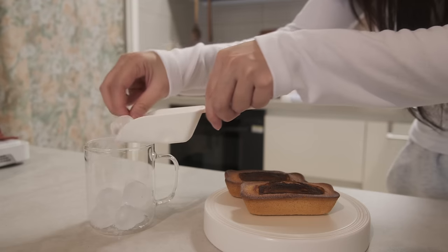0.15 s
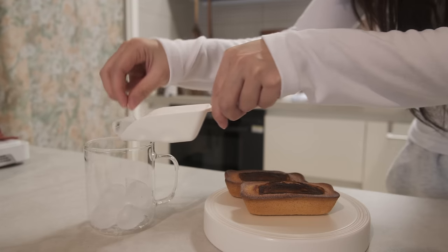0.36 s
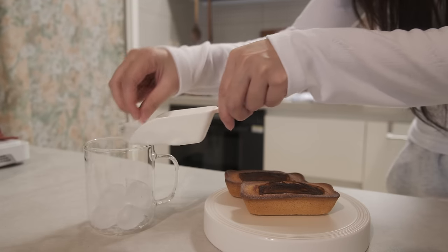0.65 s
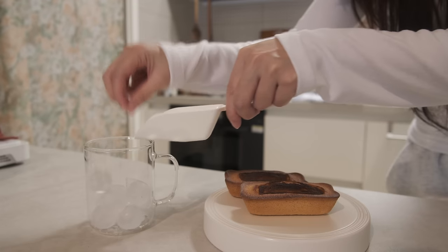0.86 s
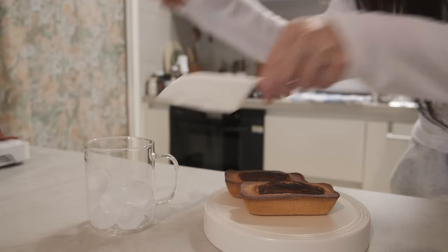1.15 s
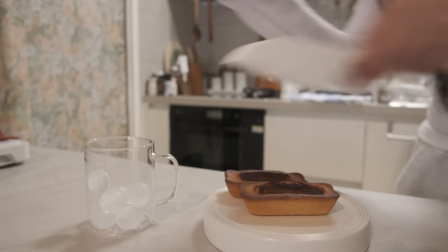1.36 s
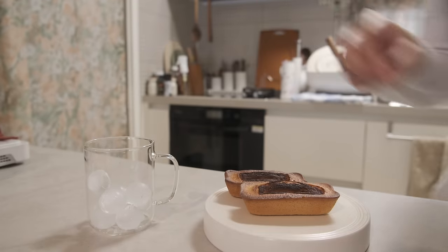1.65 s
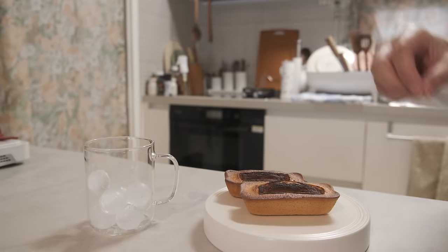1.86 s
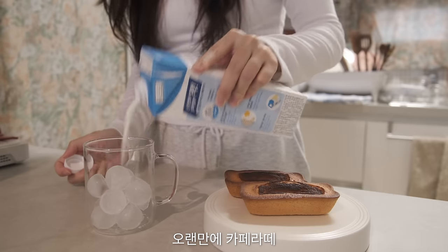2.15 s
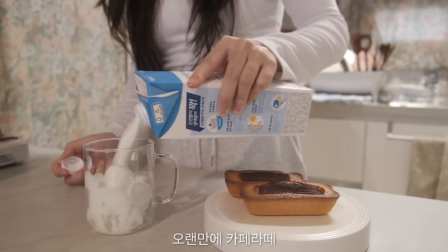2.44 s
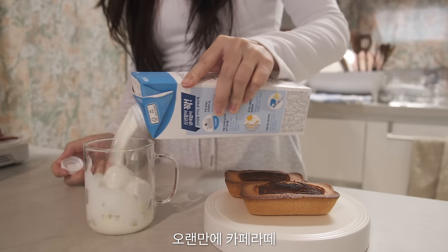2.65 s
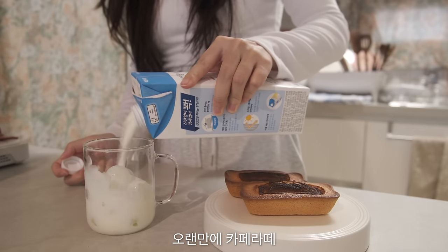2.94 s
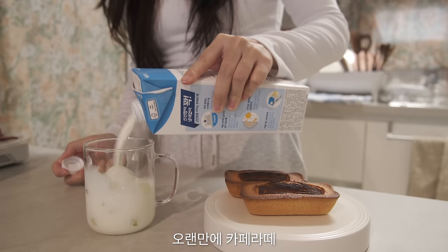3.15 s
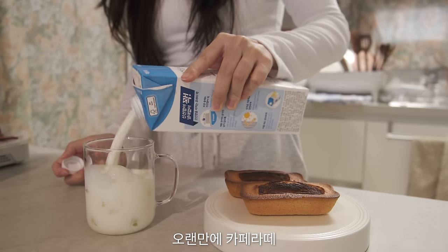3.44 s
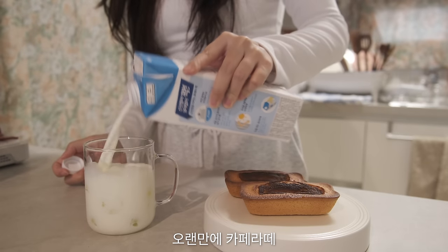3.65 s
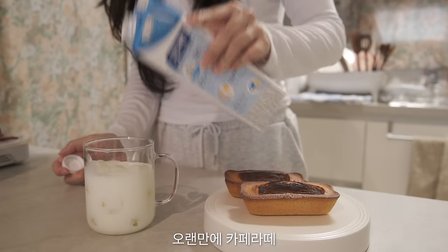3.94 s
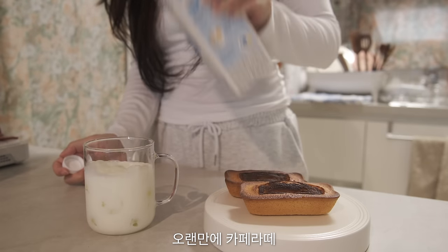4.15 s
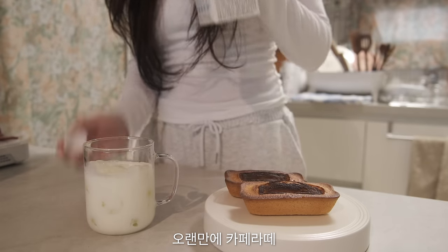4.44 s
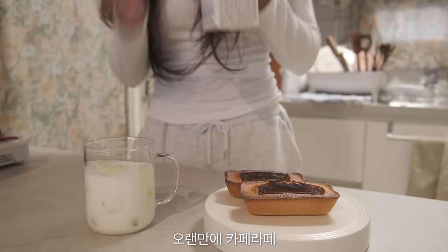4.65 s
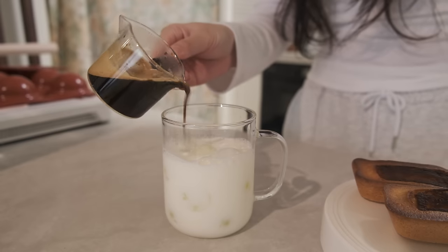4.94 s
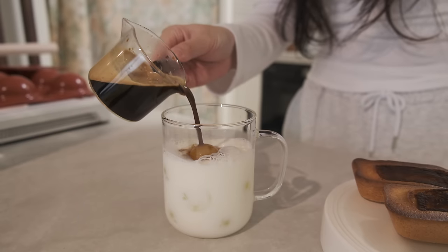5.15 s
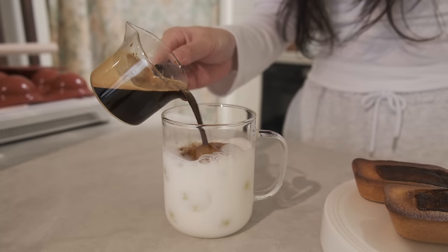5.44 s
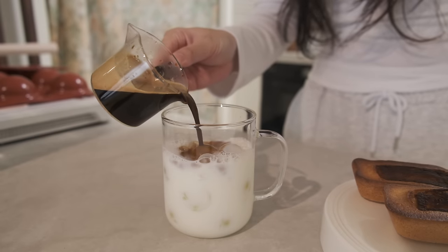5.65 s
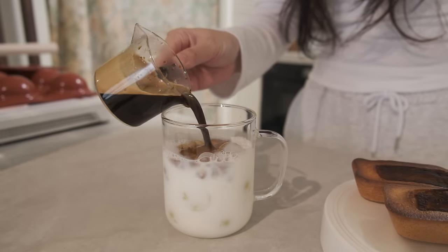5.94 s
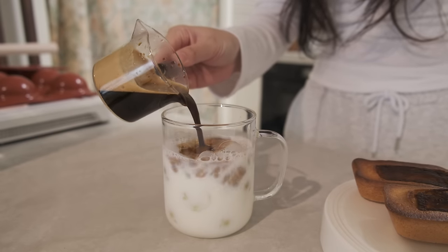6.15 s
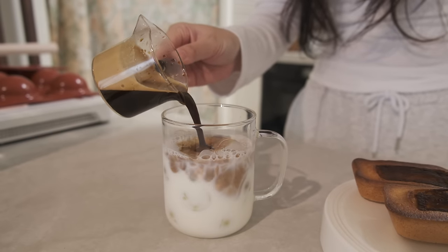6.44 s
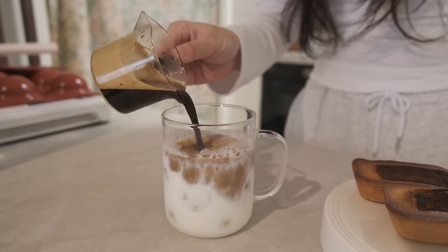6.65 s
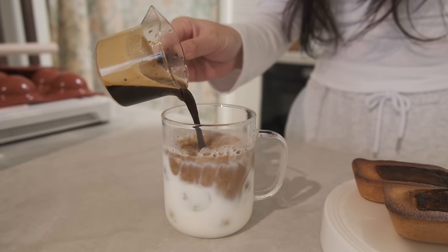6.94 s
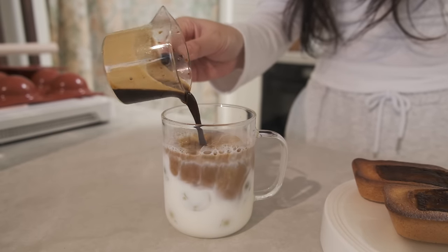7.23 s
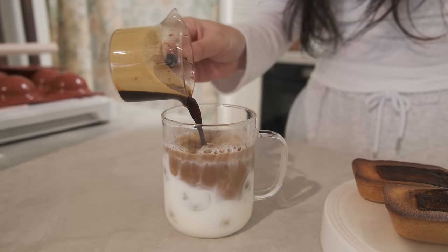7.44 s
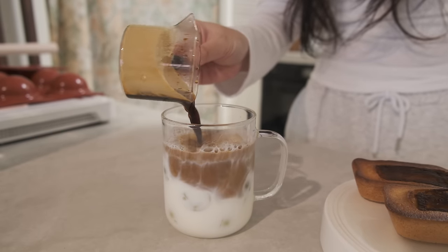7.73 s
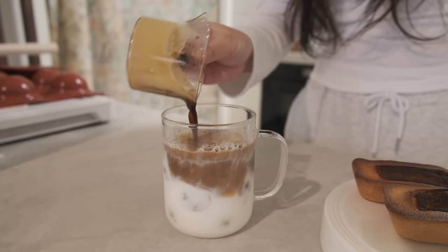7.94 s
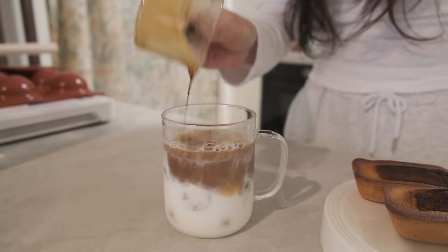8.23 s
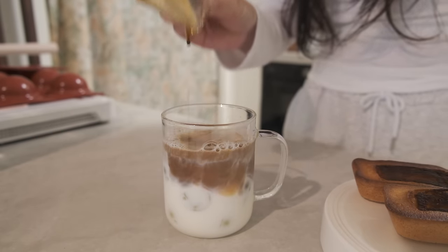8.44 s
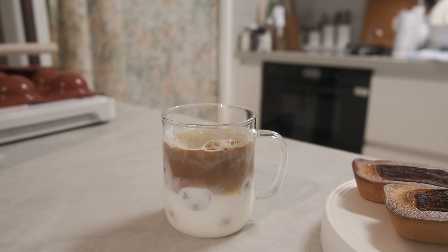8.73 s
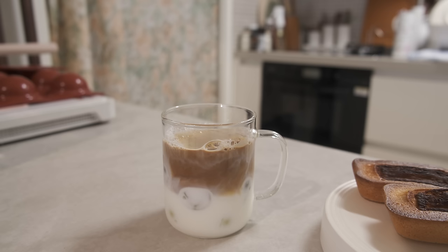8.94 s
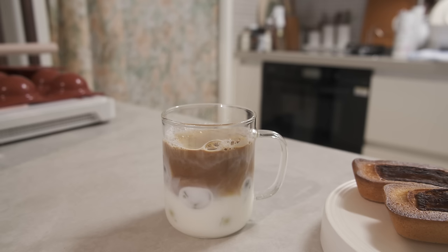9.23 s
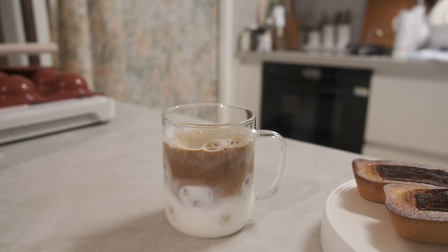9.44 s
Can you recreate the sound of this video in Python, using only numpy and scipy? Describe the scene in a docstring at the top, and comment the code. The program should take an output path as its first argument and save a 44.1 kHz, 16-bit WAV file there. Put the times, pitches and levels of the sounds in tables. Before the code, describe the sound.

A quiet kitchen, heard up close, with a faint fridge hum and hiss throughout. At the start a plastic tray clicks and rubs, and three ice balls drop into a glass mug by 0.3 seconds, each a sharp clack with a short glassy ring. Two more land at about 0.8 seconds. Around 1.5 seconds the tray gives a quick cluster of clicks and scrapes. From 2.3 to 3.4 seconds milk pours over the ice with soft gurgles, plinks and a light fizz. The ice cracks in loud, bright, irregular snaps from about 2.5 until 4.4 seconds, with slight room echo. Then it turns much quieter: a faint tick near 5 seconds, a small knock with a tiny tinkle near 5.9, and two faint ticks just after 8. From 8.6 seconds to the end, around 9.6, come a soft handling rustle and several light counter knocks.

```python
"""A quiet kitchen; a fridge hums throughout. In the first 2 s a plastic tray clicks and rubs as ice
balls are worked out and drop into a glass mug, ringing it. From 2.3 to 3.4 s milk gurgles over them;
the warming ice cracks sharply until 4.4 s. Then a few ticks and small knocks, and from 8.6 s a rustle
of handling. The room answers the hits; the loudest clip and pull the gain down."""
import sys
import numpy as np
from scipy import signal
from scipy.fft import rfft, irfft, next_fast_len
from scipy.io import wavfile
from scipy.ndimage import minimum_filter1d, map_coordinates

SR = 44100
rng = np.random.default_rng(int(sys.argv[2]) if len(sys.argv) > 2 else 0)


def bounce(signal):
    """Save signal as a 16-bit WAV file at the path given by the first command-line argument."""
    frames = np.transpose(np.atleast_2d(signal))
    limited = np.clip(frames, -1, 1)
    pcm = np.round(limited * 32767).astype(np.int16)
    wavfile.write(sys.argv[1], SR, pcm)


N = 422458
T = np.arange(N) / SR
HIT_SAMPLES = SR * 2 // 3

# Fridge tones. Each row: frequency in Hz, level in dB.
FRIDGE_HUM = [(48.4, -61.5), (193.8, -64), (290.7, -64.5), (387.6, -66), (484.5, -77), (1061, -88.5)]
# Thin high tones. Each row: frequency in Hz, level in dB, start and end in seconds.
WHINES = [(15569, -75, 0, 4.7), (15569, -82, 4.7, 9.6), (12250, -70, 4.74, 5.26), (12250, -71, 8.56, 9.6)]
# Room hiss. Each row: time in seconds, level in dB.
HISS_LEVELS = [(0, -69), (2, -59.5), (4.7, -60), (5.3, -62), (8.54, -62), (8.57, -57), (9.6, -62)]
# Drone width. Each row: frequency in Hz, left-right likeness from 0 to 1.
DRONE_LIKENESS = [(60, 0.77), (180, 1), (550, 0.53), (1650, 0.18), (4970, 0.24), (15000, 0.14)]
# Strokes of tray, sleeves and hands. Each row: peak time in seconds, swell and fade in seconds
# per 20 dB, body and fizz in dB.
STROKES = [(0.002, 0.02, 0.15, -34, -30), (0.08, 0.0065, 0.061, -43, -23), (0.109, 0.029, 0.049, -36, -31),
           (0.704, 0.054, 0.073, -39.5, -28.5), (1.164, 0.0313, 0.083, -57, -44.5),
           (1.276, .12, 0.31, -67, -54), (1.45, .005, 0.057, -32.5, -31.5), (1.486, 0.02, 0.14, -42.5, -34),
           (1.622, 0.0025, 0.038, -48.5, -33), (1.72, 0.26, .12, -55.5, -50.5),
           (4.714, 0.078, 0.062, -57.5, -50), (8.794, 0.161, 0.32, -88, -76), (8.922, .006, .12, -72, -51),
           (9.028, .004, 0.08, -77, -58), (9.143, 0.035, 0.046, -39, -61), (9.27, 0.07, 0.034, -51.5, -48),
           (9.436, .12, 0.05, -88, -93)]
# Counter knocks. Each row: start in seconds, peak in dB, pitch in Hz, sharpness in dB, t60 in seconds.
COUNTER_KNOCKS = [(5.851, -29, 530, -2, 0.065), (5.909, -63, 510, 12, 0.098),
                  (8.654, -36.5, 1210, -5, 0.36), (8.697, -37, 2237, 17, 0.26),
                  (8.938, -33.5, 1193, 22, 0.13), (9.132, -36, 1250, 1, 0.27),
                  (9.276, -26.5, 1580, -6, 0.17), (9.533, -43, 1046, 12, 0.12)]
# Tray clicks, then faint ticks. Each row: start in seconds, peak in dB, colour in Hz, t60 in seconds,
# pan in dB (left over right).
DRY_CLICKS = [(0.0772, -12, 9100, 0.018, 7), (0.1, -12.5, 3250, .01, -3), (0.4314, -49, 1723, 0.018, -10),
              (0.605, -42.5, 3660, 0.02, 1.5), (0.699, -20, 10200, 0.013, -6),
              (1.1617, -32, 2890, 0.06, -4.5), (1.277, -42, 3600, 0.033, -7), (1.319, -34.5, 10050, .03, 0),
              (1.43, -29.5, 5040, 0.08, -6), (1.4479, -18, 3240, 0.043, 0.5),
              (1.4684, -3, 10200, 0.0099, 3), (1.4846, -9.5, 8450, 0.029, -10.5),
              (1.515, -20.5, 1430, 0.013, 1.5), (1.538, -24, 1790, 0.01, -2.5),
              (1.6206, -13.5, 10200, 0.038, -12), (1.716, -35, 1490, .02, -7),
              (1.799, -29, 9700, 0.019, -8), (5.0468, -43, 2200, 0.016, -1.5),
              (5.8502, -34.5, 2250, 0.028, 5), (8.1445, -36.5, 2520, 0.0078, -5),
              (8.1567, -36, 2370, .02, -3), (8.919, -37, 6500, 0.082, -2.5),
              (9.0278, -32.5, 8800, 0.15, -6.5)]
# Distinct glugs and plinks. Each row: start in seconds, peak in dB, pitch in Hz.
LOUD_BUBBLES = [(2.3996, -29.5, 2822), (2.412, -38.5, 425), (2.4397, -32, 1450), (2.478, -33, 3405),
                (2.529, -35, 739), (2.55, -35, 3160), (2.554, -34, 928), (2.5988, -32, 2660),
                (2.64, -38.5, 684), (2.668, -34.5, 980), (2.6986, -40, 3100), (2.736, -37.5, 578),
                (2.7362, -35, 2165), (2.811, -47.5, 613), (2.8667, -25, 2020), (2.889, -30, 1073),
                (2.926, -34.5, 606), (2.9384, -34, 2362), (2.9867, -32.5, 1800), (2.988, -34, 1140),
                (3.057, -17, 1090), (3.0694, -27.5, 2035), (3.3026, -35.5, 2660), (3.4494, -38.5, 1840)]
# Milk stream. Each row: time in seconds, gurgle and fizz in dB.
POUR_LEVELS = [(2.3, -63, -68.5), (2.45, -57, -43), (2.62, -50, -52.5), (2.98, -42.5, -39.5),
               (3.11, -56, -58.5), (3.32, -49, -44.5), (3.4, -64.5, -52)]
# Ice landings. Each row: start in seconds, snap and thud peaks in dB, thud t60 in seconds,
# mug ring in dB, pan in dB.
ICE_DROPS = [(0.1434, 2, -13, 0.025, -18.5, 8.5), (0.2212, -31, -4, 0.079, -21, 0.5),
             (0.3041, -18.5, -19, 0.36, -26, 1.5), (0.8074, -4, -5.5, 0.032, -26, -2),
             (0.8340, 4, -11, 0.018, -16.5, 7)]
# Ice splits. Each row: start in seconds, snap peak in dB, bite and push in dB over the snap,
# snap t60 in seconds, pan in dB.
ICE_CRACKS = [(2.214, -31, -23, -39, 0.0072, 3.5), (2.462, -14.5, -23, -24.5, 0.028, 8),
              (2.7645, -9, -18, -24.5, 0.0085, 4), (2.81, -17, -30, -27, 0.0064, 2),
              (2.8526, -4, -20, -41, 0.018, 4.5), (3.0542, 2, -14, -15.5, 0.015, 5),
              (3.1282, -0.5, -12, -16.5, 0.02, 5.5), (3.3169, -0.5, -10.5, -19.5, 0.018, 1),
              (3.4267, 1, -15, -15.5, 0.024, 6.5), (3.5712, -4, -15.5, -17, 0.025, -0.5),
              (3.7881, -1, -9.5, -17.5, 0.016, 12), (3.793, -7, -13, -9.5, 0.014, 9),
              (3.8902, -1, -18, -39, 0.009, 3.5), (4.3771, -4.5, -5, -20.5, 0.014, -5),
              (4.3822, -16.5, 0.5, -17, 0.0098, 3)]

# Ringing modes. Each row: frequency in Hz, relative level in dB, t60 in seconds.
MUG_MODES = [(1037, -11, .3), (2380, -4, .3), (2508, -2, .34), (3393, -5, .28), (4079, -13, .18),
             (4854, -3, .28), (5484, -3, .25), (5939, -4, .33), (6643, -6, .21), (7219, -6, .21),
             (7580, -7, .2), (8459, -4, .24), (9100, -7, .24), (11160, -6, .21), (11920, -12, .18)]
TINKLE_MODES = [(7725, 5, 0.048), (10210, 0.5, 0.11)]

# Noise spectra. Each row: frequency in Hz, relative density in dB.
DRONE_SPECTRUM = [(15, -40), (25, -14.5), (54, -6), (76, -17.5), (185, -8.5), (262, -9), (289, -21),
                  (318, -13), (386, -9.5), (409, -17.5), (486, -13.5), (674, -19.5), (1070, -8),
                  (1350, -18), (1620, -16), (2500, -23.5), (3250, -51.5), (5500, -120)]
HISS_SPECTRUM = [(1180, -12), (2000, 3), (2360, -27.5), (2800, 3.5), (2950, -1), (3510, -2.5), (4700, -4),
                 (5590, -0.5), (6470, -6.5), (8450, -5), (9710, 1), (12300, -16.5), (14900, -14.5),
                 (15700, -9)]
RUB_BODY_SPECTRUM = [(180, -85), (300, 0), (380, 3), (539, 0.5), (1230, 1.5), (1700, 1), (3500, -38.5),
                     (4550, -36.5), (7700, -120)]
RUB_FIZZ_SPECTRUM = [(1470, -21.5), (2500, 0.5), (3000, -8.5), (3120, -2), (4430, -5), (7060, -4.5),
                     (10400, 1), (12100, -11.5), (14900, -27.5), (15500, -45.5)]
DROP_SNAP_SPECTRUM = [(880, -44), (1500, 0.5), (2790, -31.5), (3260, -9), (3930, 1.5), (5180, -12.5),
                      (5770, -7), (7530, -4.5), (9440, 1.5), (15700, -32.5)]
DROP_THUD_SPECTRUM = [(59, -52), (100, -9.5), (490, 4.5), (1340, 0), (2030, -6.5), (2440, -9.5),
                      (2760, -17), (3080, -1.5), (4000, -5), (5200, -35.5), (8800, -120)]
COUNTER_SPECTRUM = [(90, -26), (200, -19), (300, 26.5), (420, -7), (800, -39.5)]
DROP_ECHO_SPECTRUM = [(88, -61.5), (150, -13.5), (636, -5), (1670, -2), (1800, -6), (2020, -7), (2450, -6),
                      (2700, -13.5), (5950, -14.5), (11500, -18.5), (15000, -52.5)]
CRACK_SNAP_SPECTRUM = [(4500, -23), (6000, -10), (8000, -10.5), (9300, -1.5), (10500, 0), (11500, -4),
                       (13100, -11.5), (15700, -34.5)]
CRACK_BITE_SPECTRUM = [(1400, -32), (2400, 9.5), (3500, 12.5), (5500, 13), (7500, -47.5)]
CRACK_PUSH_SPECTRUM = [(250, -27), (600, -3), (1100, -3.5), (2000, -1), (3000, -17.5)]
CRACK_ECHO_SPECTRUM = [(1180, -13), (2000, -2), (2200, -15), (3540, -10), (3850, -16), (4660, -11),
                       (7300, -9), (9300, 0), (10400, -1), (15700, -29)]


def amp(db):
    return 10 ** (np.asarray(db) / 20)


def unit_rms(x):
    return x / np.sqrt(np.mean(x ** 2) + 1e-20)


def along(points, hz):
    """Interpolate (Hz, value) points on a log axis."""
    knots_hz, values = np.transpose(points)
    return np.interp(np.log(hz + 1), np.log(knots_hz + 1), values)


def envelopes(rows):
    """A gain per sample for each dB column; silent outside the table."""
    times_s, *columns_db = np.transpose(rows)
    return amp([np.interp(T, times_s, db, -140, -140) for db in columns_db])


def wobble(rate_hz):
    """Smooth random curve."""
    coarse_s = T[::16]
    knots = rng.standard_normal(int(N * rate_hz / SR) + 4)
    return np.interp(T, coarse_s, map_coordinates(knots, [coarse_s * rate_hz]))


def grit(rate_hz, spread_db):
    """Uneven gain of many tiny events."""
    return unit_rms(amp(spread_db * wobble(rate_hz)))


def filtered(x, response):
    """Apply a complex response, a function of Hz."""
    size = next_fast_len(x.shape[-1] + 4096)
    return irfft(rfft(x, size) * response(np.fft.rfftfreq(size, 1 / SR)), size)[..., :x.shape[-1]]


def noise(spectrum, size=N, channels=1):
    """Coloured noise, rms 1."""
    white = rng.standard_normal((channels, size))
    return unit_rms(filtered(white, lambda hz: amp(along(spectrum, hz))))


def decay(t, db, t60_s, rise_s):
    """Envelope: fast rise, exponential fall."""
    return amp(db - 60 * t / t60_s) * (1 - np.exp(-t / rise_s))


def burst(spectrum, peak_db, t60_s, rise_s=0.0007):
    """Dying puff of coloured noise."""
    t = T[:min(int(SR * 1.3 * t60_s) + 64, HIT_SAMPLES)]
    puff = decay(t, 0, t60_s, rise_s) * noise(spectrum, size=len(t))[0]
    return np.pad(amp(peak_db) * puff / np.abs(puff).max(), (0, HIT_SAMPLES - len(t)))


def add(track, start_s, sound, pan_db=0):
    """Mix into a stereo track; positive pan is left."""
    part = track[:, round(start_s * SR):][:, :sound.shape[-1]]
    part += amp([[pan_db / 2], [-pan_db / 2]]) * sound[..., :part.shape[1]]


def late_right(x, ms):
    """Right lags left by ms: a source to the left."""
    return filtered(x, lambda hz: np.exp(np.outer([1, -1], 1j * np.pi * hz * ms / 1000)))


def room_tone(drone_db=-58):
    """Fridge drone, near mono in the bass; fridge hum; a thin whine and wide hiss."""
    def mid_side_gains(hz):
        angle = np.arccos(along(DRONE_LIKENESS, hz)) / 2
        return np.array([np.cos(angle), np.sin(angle)])

    mid, side = filtered(noise(DRONE_SPECTRUM, channels=2), mid_side_gains)
    drone = amp(drone_db + 0.34 * wobble(6.3)) * np.array([mid + side, mid - side])
    hum = sum(amp(db + 0.72 * wobble(6)) * np.sin(2 * np.pi * hz * T + 1.5 * wobble(7.6))
              for hz, db in FRIDGE_HUM)
    whine = np.zeros(N)
    for hz, db, start_s, end_s in WHINES:
        gate = (T > start_s) & (T < end_s)
        whine += amp(db) * gate * np.sin(2 * np.pi * hz * T + 1.1 * wobble(199.6))
    hiss = envelopes(HISS_LEVELS)[0] * noise(HISS_SPECTRUM, channels=2)
    return (drone + hum + whine + hiss) * amp([[-1.1], [1.1]])


def room_echo(spectrum, db, t60_s):
    """Diffuse answer of the kitchen; mono only in the bass."""
    mid, side = (burst(spectrum, db, t60_s, rise_s=0.0069) for _ in range(2))
    side = filtered(side, lambda hz: hz / (hz + 900))
    return np.array([mid + side, mid - side])


def rubbing(rustle_start_s=8.562, rustle_body_db=-58.5, rustle_fizz_db=-55):
    """Friction: the same tiny slips drive each stroke's body and fizz; the late rustle is steady."""
    slips = grit(220, 1.8) * grit(30, 0.7)
    body = noise(RUB_BODY_SPECTRUM) + 0.4 * noise(RUB_BODY_SPECTRUM, channels=2)
    fizz = noise(RUB_FIZZ_SPECTRUM) + 0.65 * noise(RUB_FIZZ_SPECTRUM, channels=2)
    gains = amp([[rustle_body_db], [rustle_fizz_db]]) * (T > rustle_start_s)
    for peak_s, swell_s, fade_s, body_db, fizz_db in STROKES:
        span = slice(max(round((peak_s - 3 * swell_s) * SR), 0), round((peak_s + 3 * fade_s) * SR))
        shape_db = 20 * np.minimum((T[span] - peak_s) / swell_s, (peak_s - T[span]) / fade_s)
        gains[:, span] += slips[span] * amp(shape_db) * amp([[body_db], [fizz_db]])
    return gains[0] * body + gains[1] * late_right(fizz, ms=0.07)


def tinkle(start_s=5.852, level_db=-48.5):
    """Two high modes of something small and hard, on the first knock."""
    out, t = np.zeros((2, N)), T[:SR // 4]
    ring = sum(amp(level_db + db - 60 * t / t60_s) * np.sin(2 * np.pi * hz * t)
               for hz, db, t60_s in TINKLE_MODES)
    add(out, start_s, ring, pan_db=1.5)
    return out


def knocks():
    """Dull contacts on the counter: noise in one resonance, sharp or broad, plus a fainter tick."""
    out = np.zeros((2, N))
    for start_s, db, hz, sharp_db, t60_s in COUNTER_KNOCKS:
        resonance = [(hz / 12, -70), (hz / 4, -sharp_db - 14), (hz / 1.8, -sharp_db - 3),
                     (hz / 1.2, -sharp_db), (hz / 1.05, 0), (hz * 1.05, 0), (hz * 0.91, -sharp_db),
                     (hz * 3, -sharp_db - 18.5), (hz * 30, -80)]
        knock = burst(resonance, db, t60_s, rise_s=0.00058)
        tick = burst(RUB_FIZZ_SPECTRUM, db - 13, 1.25 * t60_s, rise_s=0.0014)
        add(out, start_s, knock + tick + room_echo(resonance, db - 5.2, t60_s=0.3))
    return out


def clicks():
    """Tray clicks and later ticks: short noise, each peaked at its own colour."""
    out = np.zeros((2, N))
    for start_s, db, hz, t60_s, pan_db in DRY_CLICKS:
        colour = [(hz / 30, -40), (hz / 4, -16), (hz / 1.4, -10), (hz, 0),
                  (hz * 1.4, -10), (hz * 5, -26)]
        click = burst(colour, db, t60_s, rise_s=0.0004)
        add(out, start_s, click + room_echo(colour, db - 20, t60_s=0.25), pan_db)
    lowpassed = filtered(out, lambda hz: 1 / (1 + (hz / 12500) ** 8))
    return late_right(lowpassed, ms=-0.021)


def bubble(db, hz, t60_s):
    """Damped tone; pitch creeps up as the bubble nears the surface."""
    t = T[:min(int(SR * t60_s), SR // 8)]
    return decay(t, db, t60_s, rise_s=0.0007) * np.sin(2 * np.pi * hz * t * (1 + 0.4 * t))


def bubble_cloud(db, hz, t60_s):
    """Ragged cloud of like-sized bubbles, as a band of noise."""
    band = [(hz / 2, -40), (hz / 1.08, -16), (hz, 0), (hz * 1.1, -14), (hz * 2, -34)]
    return burst(band, db, t60_s, rise_s=0.00087)


def milk(swarm_count=650, pan_db=1.5):
    """Low glugs and high plinks over a swarm of fainter bubbles, stream splash and fizz of wetted ice."""
    loud, swarm = np.zeros((2, N)), np.zeros((2, N))
    for start_s, db, hz in LOUD_BUBBLES:
        add(loud, start_s, bubble(db - 5, hz, t60_s=0.017), pan_db)
        add(loud, start_s, bubble_cloud(db, hz, t60_s=0.135), pan_db)
    first_s, last_s = POUR_LEVELS[0][0], POUR_LEVELS[-1][0]
    for when, pitch, strength in rng.uniform(size=(swarm_count, 3)):
        hz = 450 * 8.5 ** pitch
        blip = bubble(5 * np.log(strength), hz, t60_s=60 / hz)
        add(swarm, first_s + when * (last_s - first_s), blip, pan_db)
    gurgle_gain, fizz_gain = envelopes(POUR_LEVELS)
    swarm /= np.sqrt(np.mean(swarm[:, gurgle_gain > 1e-6] ** 2))  # rms 1 during the pour
    splash = noise([(200, -46), (500, -12), (1200, -1.5), (3200, 1), (6000, -25.5)], channels=2)
    gurgle = gurgle_gain * (swarm + amp(-4) * splash)
    fizz = fizz_gain * grit(350, 4.0) * noise(CRACK_SNAP_SPECTRUM, channels=2)
    return late_right(loud + gurgle + fizz, ms=0.037)


def ice_ping(db, t60_s):
    """Brief top note of a sharp ice contact."""
    t, hz = T[:HIT_SAMPLES], rng.normal(10000, 400)
    return decay(t, db, t60_s, rise_s=0.00029) * np.sin(2 * np.pi * hz * t)


def mug_ring():
    """Glass modes; level and phase vary per strike."""
    ring, t = np.zeros(HIT_SAMPLES), T[:HIT_SAMPLES]
    for hz, db, t60_s in MUG_MODES:
        envelope = amp(db + rng.normal(0, 1.6) - 60 * t / t60_s)
        ring += envelope * np.sin(2 * np.pi * hz * t + rng.uniform(0, 2 * np.pi))
    return ring


def ice_drops(snap_t60_s=0.02):
    """Each landing snaps, thuds in the heap of ice, rings the mug and thumps the counter."""
    out = np.zeros((2, N))
    for start_s, snap_db, thud_db, thud_t60_s, ring_db, pan_db in ICE_DROPS:
        ring = amp(ring_db) * mug_ring()
        ping = ice_ping(snap_db - 6, 0.84 * snap_t60_s)
        snap = burst(DROP_SNAP_SPECTRUM, snap_db, snap_t60_s, rise_s=0.0006)
        thud = burst(DROP_THUD_SPECTRUM, thud_db, thud_t60_s)
        thump = burst(COUNTER_SPECTRUM, thud_db - 18.5, t60_s=0.047, rise_s=0.0014)
        echo = room_echo(DROP_ECHO_SPECTRUM, thud_db - 3.5, t60_s=0.49)
        add(out, start_s, ping + snap + thud + ring + thump + echo, pan_db)
    return late_right(out, ms=0.054)


def ice_cracks():
    """Ice splits as the milk warms it: a bright snap, a lower bite and a short dull push."""
    bright, dull = np.zeros((2, N)), np.zeros((2, N))
    for start_s, snap_db, bite_db, push_db, t60_s, pan_db in ICE_CRACKS:
        ping = ice_ping(snap_db - 6.5, 0.26 * t60_s)
        snap = burst(CRACK_SNAP_SPECTRUM, snap_db, t60_s, rise_s=0.0012)
        bite = burst(CRACK_BITE_SPECTRUM, snap_db + bite_db, t60_s)
        push = burst(CRACK_PUSH_SPECTRUM, snap_db + push_db, 2.3 * t60_s)
        echo = room_echo(CRACK_ECHO_SPECTRUM, 0.78 * snap_db - 23.5, t60_s=0.36)
        add(bright, start_s, ping + snap, pan_db)
        add(dull, start_s, bite + push + echo, pan_db / 3)
    return late_right(bright, ms=0.12) + late_right(dull, ms=0.064)


def scene():
    return ice_drops() + clicks() + ice_cracks() + knocks() + tinkle() + milk() + rubbing() + room_tone()


def record(dry):
    """Gain control ducks late, holds and recovers; faster peaks clip; band limit."""
    threshold_db, lag_s, smooth_s, release_db_per_s = -9, 0.0055, 0.0038, 49
    duck_db_per_db, hold_samples, top_hz = 0.7, SR // 8, 15890
    peak_db = 20 * np.log10(np.abs(dry).max(0) + 1e-9)
    duck_db = duck_db_per_db * np.maximum(peak_db - threshold_db, 0)
    held_db = -minimum_filter1d(-duck_db, size=hold_samples, origin=(hold_samples - 1) // 2)
    ramp_db = release_db_per_s * T
    released_db = np.maximum.accumulate(held_db + ramp_db) - ramp_db
    late_db = np.interp(T - lag_s, T, released_db)
    pole = np.exp(-1 / (smooth_s * SR))
    ducked = dry * amp(-signal.lfilter([1 - pole], [1, -pole], late_db))
    soft_clipped = ducked / (1 + np.abs(ducked) ** 12) ** (1 / 12)
    return np.clip(filtered(soft_clipped, lambda hz: hz < top_hz), -1, 1)


dry = scene()
out = record(dry)
bounce(out)
```